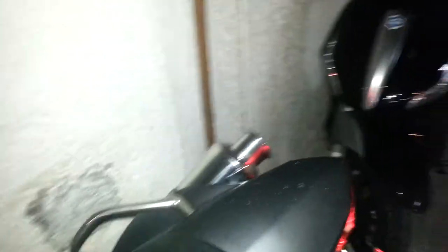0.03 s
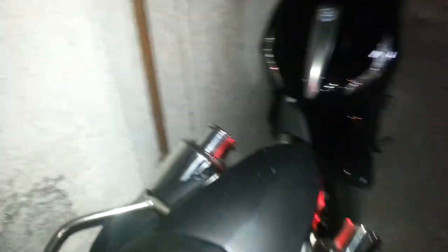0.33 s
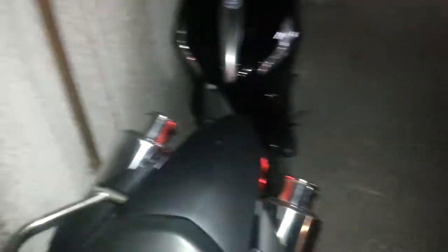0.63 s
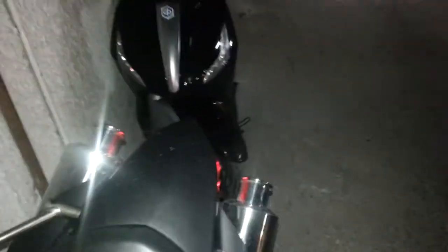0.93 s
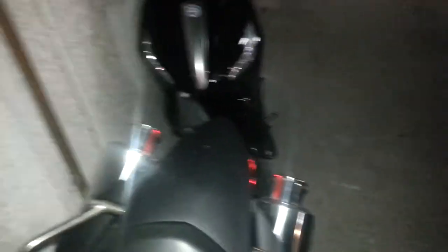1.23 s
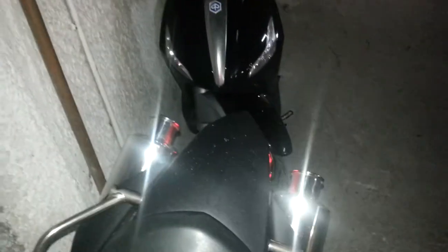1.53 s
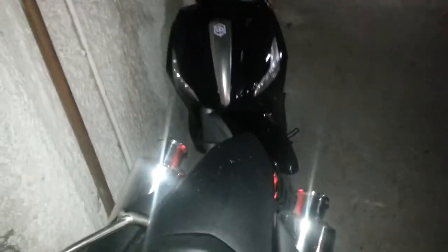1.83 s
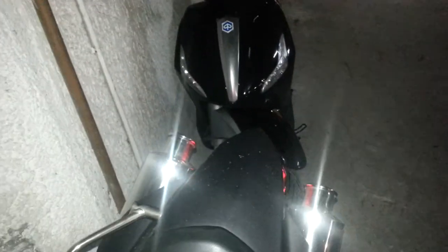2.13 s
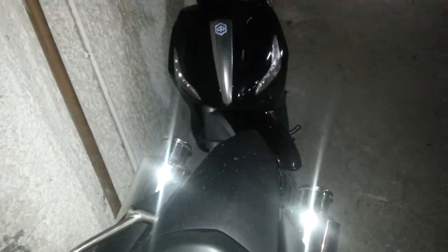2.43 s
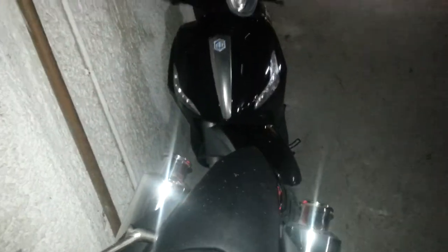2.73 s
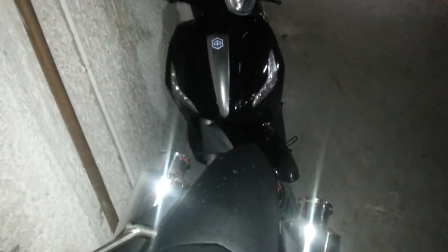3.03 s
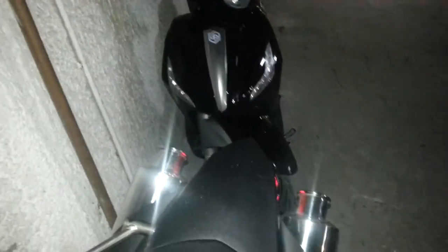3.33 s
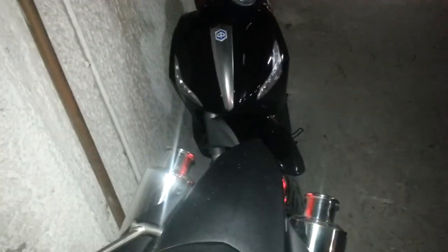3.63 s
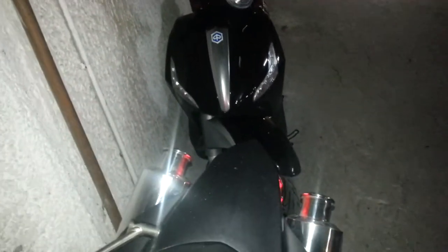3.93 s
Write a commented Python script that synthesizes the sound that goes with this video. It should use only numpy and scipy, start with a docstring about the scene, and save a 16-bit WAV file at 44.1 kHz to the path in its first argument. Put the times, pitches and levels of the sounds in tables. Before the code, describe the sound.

A motorcycle cranks, catches with a bang and runs loudly in a small garage.

```python
"""A single-cylinder motorcycle is started in a small concrete garage, heard from behind its silencers.
First clothes rustle and plastic parts click. At 2.3 s the starter clacks in, and its gear teeth
excite the housing through four compressions while the exhaust puffs twice. At 3.1 s the engine
catches with a bang; its pressure pulses drive the silencers' resonances as it flares up and sinks
back, loud enough to overload the microphone."""
import sys
import numpy as np
from scipy import signal
from scipy.fft import rfft, irfft
from scipy.io import wavfile

SR = 44100
rng = np.random.default_rng(int(sys.argv[2]) if len(sys.argv) > 2 else 0)


def bounce(signal):
    """Save signal as a 16-bit WAV file at the path given by the first command-line argument."""
    frames = np.transpose(np.atleast_2d(signal))
    limited = np.clip(frames, -1, 1)
    pcm = np.round(limited * 32767).astype(np.int16)
    wavfile.write(sys.argv[1], SR, pcm)


N = 176400
T = np.arange(N) / SR

# Spectra. Each row: frequency in Hz, relative level in dB.
AIR_SPECTRUM = [(25, -24), (60, -12), (130, -4.5), (260, 2.5), (600, -5.5), (1000, -12), (2000, -18.5),
                (7000, -22.5), (15000, -18.5)]
CLOTH_SPECTRUM = [(100, -46), (300, -4), (700, 1.5), (1500, -4.5), (3000, -3), (4500, -7), (6500, -15.5),
                  (10000, -14.5), (15000, -17)]
CLACK_SPECTRUM = [(100, -35), (500, -16), (1500, -8), (2500, 9), (4500, 7), (7000, -9), (11000, -14),
                  (15000, -22)]
MOTOR_SPECTRUM = [(100, -40), (200, -12), (280, 0), (400, -10), (650, -3.5), (1000, -5), (1400, -7.5),
                  (2200, -15.5), (8000, -39)]
GEARCASE_SPECTRUM = [(88, -65), (150, -25), (200, -20), (294, -19), (337, -33), (433, -15), (649, -6.5),
                     (1070, -12), (1320, -0.5), (1570, -5), (1910, -6), (2500, -1), (3150, 6), (4370, -6.5),
                     (6550, -25.5), (10000, -21), (15000, -59)]
DRAUGHT_SPECTRUM = [(10, -15), (30, 2), (60, 5), (110, -16), (300, -42), (2000, -90)]
EXHAUST_SPECTRUM = [(25, -37), (60, -14), (105, -11), (140, 1.5), (250, -2.5), (310, -2.5), (380, -1.5),
                    (460, -7), (600, -8.5), (1400, -27.5), (15000, -70)]
GAS_SPECTRUM = [(60, -29), (200, -12), (350, -2), (550, -1.5), (850, -9.5), (1400, -18), (3000, -30),
                (15000, -50.5)]
RASP_SPECTRUM = [(100, -19.5), (700, 8), (1600, 2.5), (2600, 4.5), (3600, 2), (4700, -6), (6300, -16),
                 (9000, -15), (15000, -23.5)]
# Resonances. Each row: frequency in Hz, relative level in dB, 60 dB decay time in seconds.
HOUSING_MODES = [(1362, -4, 0.026), (1855, -12, 0.12), (2608, 5, 0.031), (2930, 3, 0.025),
                 (3170, -2.5, 0.02), (3570, -14, .03), (4234, -6.5, 0.029)]
PUFF_MODES = [(74, 3, 0.25), (142, 7.5, 0.195), (263, 17, 0.13)]
BANG_MODES = [(140, -13, 0.089), (192, 3.5, 0.056), (257.6, -0.5, 0.19), (392.7, -5.5, .25)]
SILENCER_MODES = [(138, -6, .2), (260, -11, .15), (360, -9, .12), (396, 0, .22), (525, -14, .1)]
# Envelopes. Each row: time in seconds, level in dB.
CLOTH_ENVELOPE = [(0, -50), (.15, -51), (.43, -52), (.68, -44), (.76, -49), (.95, -49.5), (1.18, -45),
                  (1.45, -53.5), (1.75, -59), (2.3, -60.5)]
DRAUGHT_ENVELOPE = [(2.55, -85), (2.58, -45), (3.08, -45), (3.17, -22), (3.25, -23), (3.33, -14),
                    (3.43, -52), (4, -37)]
# Handling clicks. Each row: start in seconds, level in dB, pitch in Hz.
HANDLING_CLICKS = [(.241, -38.5, 850), (0.2802, -26, 487), (.6925, -29, 1870), (.868, -34, 850),
                   (1.319, -35, 1050), (1.365, -31.5, 960), (1.4354, -31.5, 900), (1.507, -30, 870),
                   (1.8157, -31, 845), (1.86, -36.5, 1210)]
# Modes of a click. Each row: multiple of its pitch, level in dB, 60 dB decay time in seconds.
PLASTIC_MODES = [(1, 3, 0.01), (1.5, 2.5, 0.011), (2.4, -2, 0.01), (3.5, -14, .008)]
# The garage. Each row: frequency in Hz, reverberation time in seconds.
REVERB_TIMES = [(100, 0.29), (500, 0.56), (2000, 0.29), (6000, 0.44), (15000, 0.23)]
# Starter gear speed. Each row: time in seconds, tooth rate in Hz.
TOOTH_RATE = [(2.33, 1230), (2.37, 1390), (2.405, 1395), (2.445, 1160), (2.51, 1110), (2.6, 1238),
              (2.66, 1300), (2.73, 1335), (2.8, 1430), (2.85, 1370), (2.94, 1350), (3.003, 1485),
              (3.04, 1150), (3.08, 1020)]
# Load on the gears. Each row: start in seconds, level in dB, hold in seconds.
COMPRESSIONS = [(2.343, -15, 0.092), (2.546, -17, 0.095), (2.77, -14.5, 0.063), (2.983, -13.5, 0.051)]
# Gear tones. Each row: multiple of the tooth rate, level in dB.
MESH_HARMONICS = [(1, -13), (2, -12), (3, -28)]
# Exhaust puffs. Each row: start in seconds, level in dB.
UNFIRED_PUFFS = [(2.576, -24), (2.952, -24)]
# Engine speed. Each row: time in seconds, firings per second.
FIRING_RATE = [(3.164, 21), (3.225, 26.5), (3.265, 35), (3.37, 43.3), (3.44, 37), (3.52, 32.3),
               (3.62, 28.3), (3.73, 25.2), (3.82, 23), (4, 20.5)]
# Firing strength. Each row: time in seconds, boom level in dB, rasp level in dB.
FIRING_LEVELS = [(3.164, -2.5, -7), (3.208, -7, -10.5), (3.3, -3.5, -8.5), (3.42, -7.5, -10.5),
                 (3.54, -6, -15), (3.68, -9, -18), (3.8, -9.5, -16), (3.86, -11.5, -23), (3.92, -13, -15.5),
                 (4, -9, -27.5)]

ENGAGE_S, RELEASE_S, BANG_S, FIRING_FROM_S = 2.323, 3.084, 3.0905, 3.164


def amp(db):
    """Decibels to amplitude ratio."""
    return 10 ** (np.asarray(db) / 20)


def unit(x):
    """Normalises to an rms of one."""
    return x / np.sqrt(np.mean(x ** 2) + 1e-20)


def read(points, hz):
    """Interpolates on a log-frequency axis."""
    f, value = np.transpose(points)
    return np.interp(np.log(hz + 1), np.log(f + 1), value)


def curve(rows, column=1):
    """Interpolates a table column at every sample."""
    return np.interp(T, np.array(rows)[:, 0], np.array(rows)[:, column])


def through(x, response):
    """Convolution with an impulse response of unit energy."""
    response = np.atleast_2d(response)
    response = response / np.linalg.norm(response, axis=1, keepdims=True)
    return signal.fftconvolve(np.atleast_2d(x), response, axes=1)[:, :N]


def colour(x, spectrum, size=8192):
    """Minimum-phase filter of the given spectral shape."""
    log_gain = np.log(amp(read(spectrum, abs(np.fft.fftfreq(size, 1 / SR)))))
    response = np.fft.ifft(np.exp(np.conj(signal.hilbert(log_gain)))).real
    return through(x, response[:size // 2])


def ring(modes, start=0):
    """Free vibration: a sum of damped sinusoids."""
    t = np.maximum(T - start, 0)
    return sum(amp(db - 60 * t / t60) * np.sin(2 * np.pi * hz * t) for hz, db, t60 in modes)


def decay(start, tau_s):
    """Sudden onset and exponential decay."""
    return (T >= start) * np.exp(-np.maximum(T - start, 0) / tau_s)


def wander(hz):
    """Random fluctuation: low-passed noise of unit rms."""
    rolloff = 1 + (np.fft.rfftfreq(N, 1 / SR) / hz) ** 4
    return unit(irfft(rfft(rng.standard_normal(N)) / rolloff, N))


def noise():
    """Uncorrelated white noise at two microphones."""
    return rng.standard_normal((2, N))


def low_cut(x, hz):
    """Fourth-order high-pass."""
    return signal.sosfilt(signal.butter(4, hz, "high", fs=SR, output="sos"), x)


def garage(x, wet_db, left_db=0, apart=1, size=22050):
    """Reverberation: dense wall reflections follow the direct sound; apart decorrelates the channels."""
    taps = rng.standard_normal((3, size)) * (rng.random((3, size)) < .1) * (T[:size] > .003)
    reflections = taps[:2] * apart + taps[2] * np.sqrt(max(1 - apart ** 2, 0))
    hz, t, bands = signal.stft(reflections, SR, nperseg=256)
    tail = signal.istft(bands * amp(-60 * t / read(REVERB_TIMES, hz)[:, None]), SR, nperseg=256)[1]
    balance = amp([[left_db / 2], [-left_db / 2]])
    return (x + amp(wet_db) * through(x, tail)) / np.hypot(1, amp(wet_db)) * balance


def background(hum_hz=100):
    """Friction noise of clothing fluctuates over steady air noise and a faint mains hum."""
    air = colour(noise() + 0.99 * noise()[0], AIR_SPECTRUM)
    cloth = colour(noise() * amp(wander(100)), CLOTH_SPECTRUM) * amp(curve(CLOTH_ENVELOPE))
    return amp(-53.5) * unit(air) + cloth + amp(-66) * np.sin(2 * np.pi * hum_hz * T)


def clicks(echo_s=0.0052):
    """Light impacts excite damped modes in plastic; the near wall returns an early reflection."""
    direct = 0
    for start, db, pitch in HANDLING_CLICKS:
        modes = [(pitch * k, level, t60) for k, level, t60 in PLASTIC_MODES]
        direct += amp(db) * (0.45 * ring(modes, start) + 0.15 * noise() * decay(start, .001))
    return garage(direct + 0.49 * np.roll(direct, round(echo_s * SR), axis=1), wet_db=-7.5)


def starter_clack():
    """The impact of the engaging drive radiates a broadband burst."""
    burst = colour(noise() * decay(ENGAGE_S, 0.011), CLACK_SPECTRUM)
    return garage(amp(-8.5) * burst, wet_db=-17)


def starter_motor(mesh_cycles, drive):
    """Rotation gives a whine at the tooth rate and a subharmonic growl over broadband noise."""
    whine = amp(-30.5 + 4 * wander(22)) * np.sin(2 * np.pi * mesh_cycles)
    growl = amp(-32.5) * np.sin(np.pi * mesh_cycles)
    whirr = amp(-26) * colour(noise()[0] + .5 * noise(), MOTOR_SPECTRUM)
    return garage(drive * (whirr + whine + growl), wet_db=-11.5, left_db=-4.5)


def gear_rattle(mesh_cycles, drive, rise_s=0.0054, fall_s=0.028):
    """Forced vibration: tooth impacts and friction shake the housing, hardest under compression."""
    impacts = unit(np.diff(np.floor(mesh_cycles), prepend=0) * amp(3.5 * wander(900)))
    scrape = unit(noise() * np.exp(-(mesh_cycles % 1) / 0.38))
    force = unit(impacts - impacts.mean() + 2.7 * scrape) * amp(3.17 * wander(73))
    casing = 0.97 * colour(force, GEARCASE_SPECTRUM) + .55 * through(force, ring(HOUSING_MODES))
    tones = sum(amp(db + 6.4 * wander(46)) * np.sin(2 * np.pi * k * mesh_cycles)
                for k, db in MESH_HARMONICS)
    load = 0
    for start, db, hold in COMPRESSIONS:
        rise = np.clip((T - start) / rise_s + .5, 0, 1)
        load += amp(db) * rise * np.exp(-np.maximum(T - start - hold, 0) / fall_s)
    return garage(np.hypot(load, amp(-22) * drive) * (casing + tones), wet_db=-3, left_db=1)


def starter(rise_s=0.0095, fade_s=0.14):
    """Gears and motor are coupled, so they share one phase; both fade after release."""
    mesh_cycles = np.cumsum(curve(TOOTH_RATE) * (1 + .012 * wander(60))) / SR
    drive = np.clip((T - ENGAGE_S) / rise_s, 0, 1) * np.exp(-np.maximum(T - RELEASE_S, 0) / fade_s)
    return gear_rattle(mesh_cycles, drive) + starter_motor(mesh_cycles, drive) + starter_clack()


def draught():
    """Turbulence: air from the silencers buffets the microphone with a low rumble."""
    rumble = colour(noise() + .5 * noise()[0], DRAUGHT_SPECTRUM)
    return rumble * amp(curve(DRAUGHT_ENVELOPE)) * amp([[-5], [1]])


def puffs():
    """Unfired charges softly excite the exhaust's low resonances."""
    return 0.15 * sum(amp(db) * ring(PUFF_MODES, start) for start, db in UNFIRED_PUFFS)


def bang():
    """Impulse excitation: the first firing sets the exhaust ringing hollowly, with a burst of noise."""
    burst = colour(noise() * decay(BANG_S, 0.017), EXHAUST_SPECTRUM)
    return garage(amp(2) * (ring(BANG_MODES, BANG_S) + 0.37 * burst), wet_db=-10.5, apart=0.45)


def engine():
    """Source and filter: pressure pulses and gas noise drive the resonant exhaust as its jet rasps."""
    rate = curve(FIRING_RATE)
    running = T >= FIRING_FROM_S
    cycles = np.cumsum(rate * running) / SR
    since_firing = cycles % 1 / rate
    strength = running * amp(.7 * rng.standard_normal(64)[cycles.astype(int)])
    firings = np.diff(np.ceil(cycles), prepend=0)
    mid_cycle = np.diff(np.round(cycles), prepend=0)
    pulses = (firings + 0.31 * mid_cycle) * .9 * np.sqrt(SR / rate)
    gas = (noise()[0] + .5 * noise()) * (0.66 + 0.53 * np.exp(-since_firing / 0.022))
    push = strength * amp(curve(FIRING_LEVELS))
    boom = .5 * colour(push * (pulses + .55 * gas), EXHAUST_SPECTRUM)
    rush = .36 * colour(push * gas, GAS_SPECTRUM)
    ringing = .55 * through(push * (pulses + 0.32 * gas), ring(SILENCER_MODES))
    jet = noise() * (0.44 + 1.21 * np.exp(-since_firing / 0.0067)) * strength
    rasp = colour(jet * amp(curve(FIRING_LEVELS, column=2) + 4.1 * wander(280)), RASP_SPECTRUM)
    return (ringing + garage(boom + rush, wet_db=2, left_db=-2.5, apart=0.5)
            + garage(rasp, wet_db=-6, left_db=1))


def scene():
    """Superposition: the pressures of all sources add."""
    return (background() + low_cut(clicks(), hz=280) + low_cut(starter(), hz=170)
            + puffs() + bang() + low_cut(engine(), hz=78) + draught())


def record(dry, knee=12, cutoff_hz=14800):
    """Saturation: with upper mids favoured on the left, the input overloads and is band-limited."""
    presence = signal.lfilter(*signal.iirpeak(2300, 1.3, fs=SR), dry)
    picked_up = dry + 0.27 * presence * np.array([[1], [-1]])
    clipped = picked_up / (1 + picked_up ** knee) ** (1 / knee)
    low_pass = signal.firwin(255, cutoff_hz, window=("kaiser", 7), fs=SR)
    return signal.oaconvolve(clipped, low_pass[None], "same")


dry = scene()
out = record(dry)
bounce(out)
```